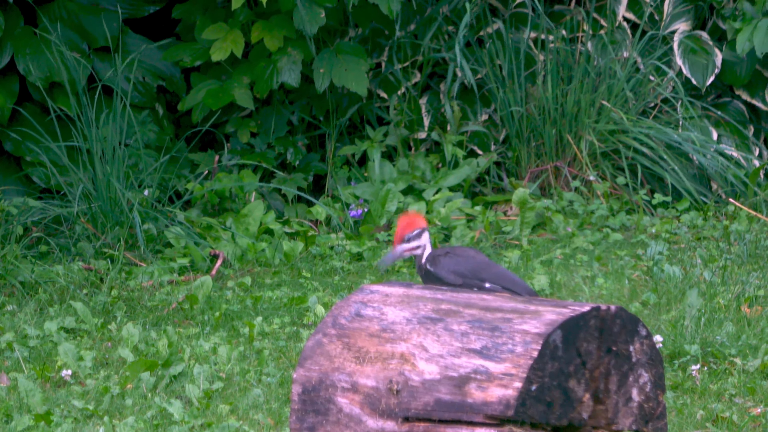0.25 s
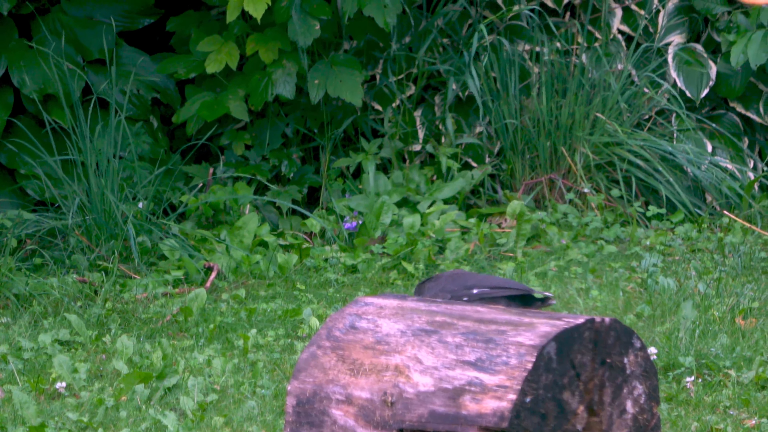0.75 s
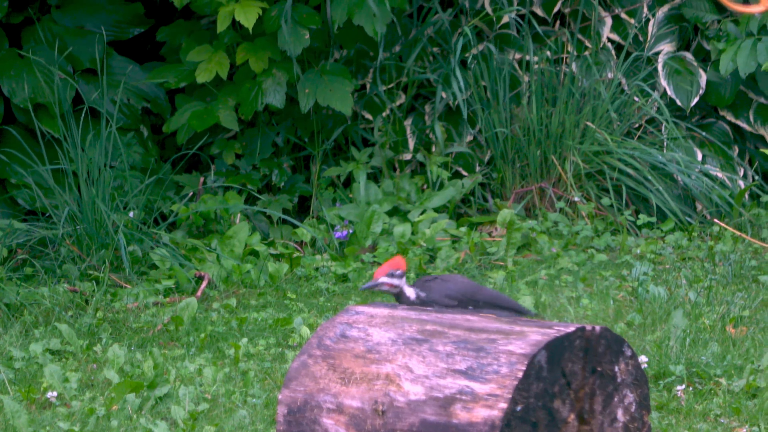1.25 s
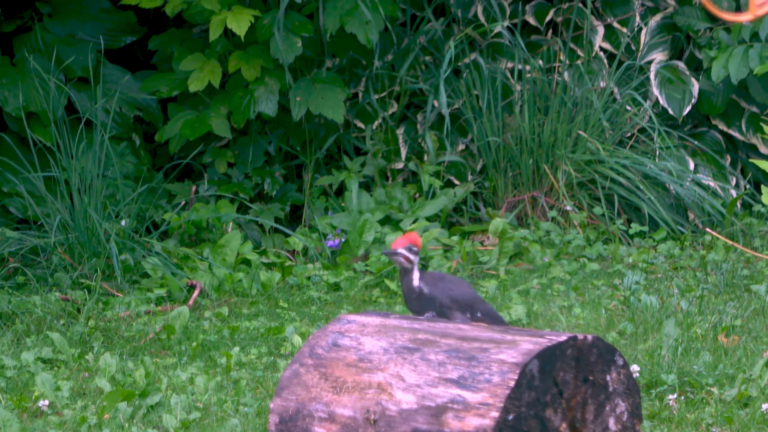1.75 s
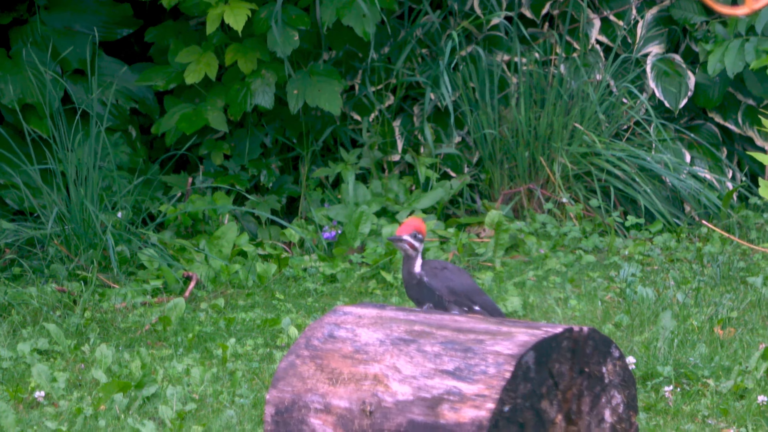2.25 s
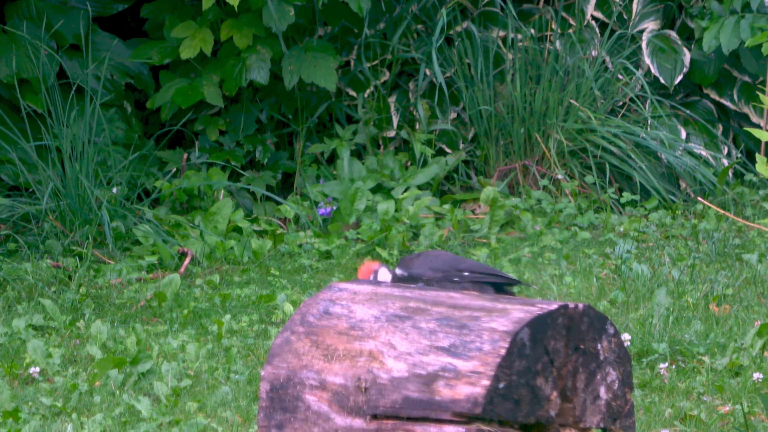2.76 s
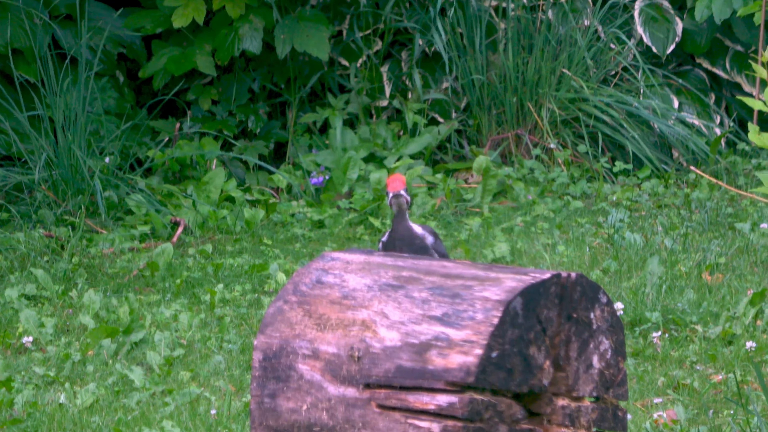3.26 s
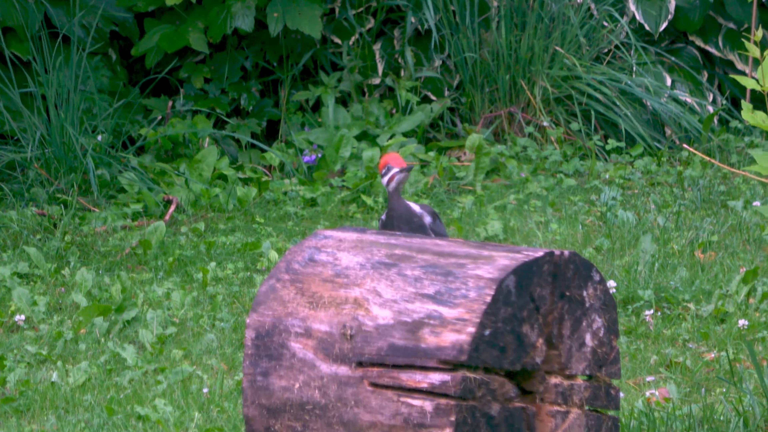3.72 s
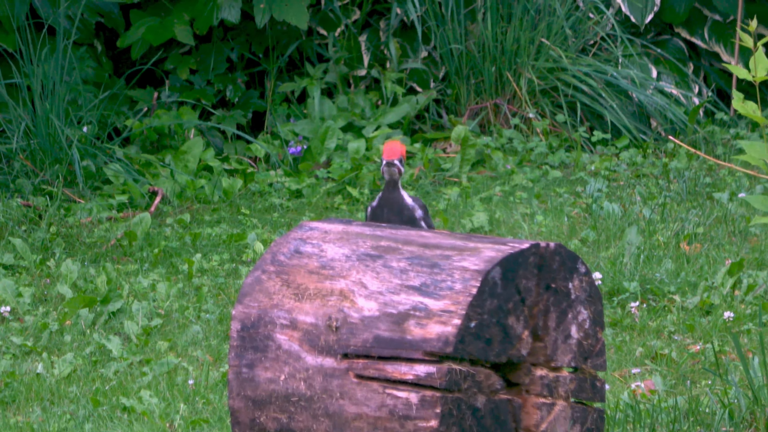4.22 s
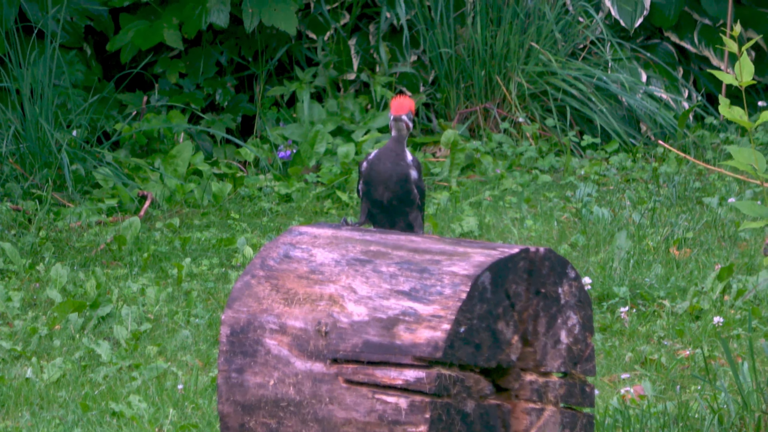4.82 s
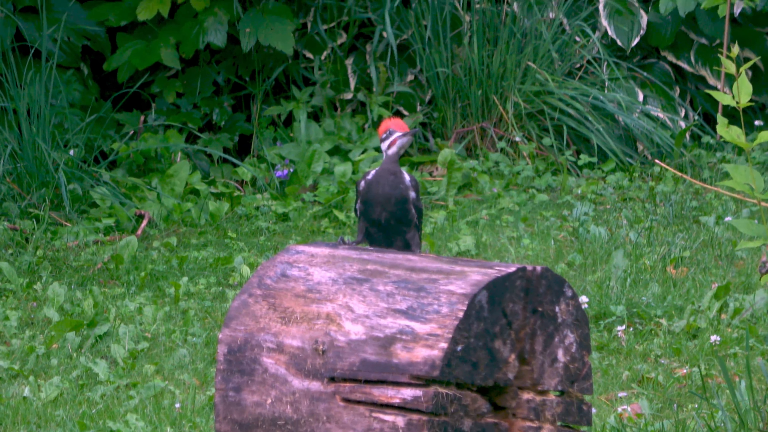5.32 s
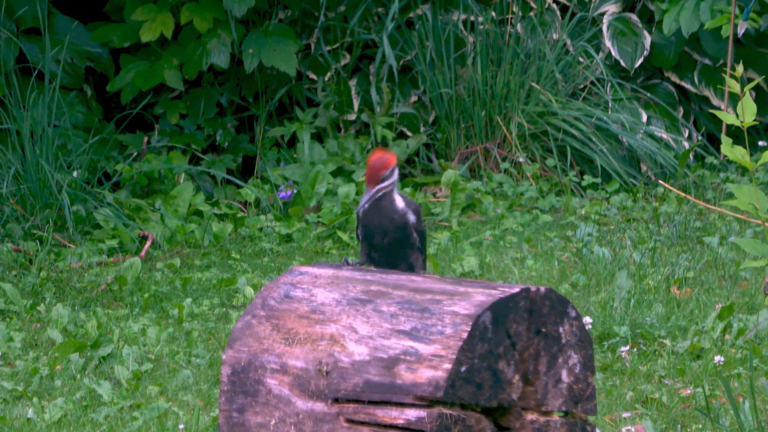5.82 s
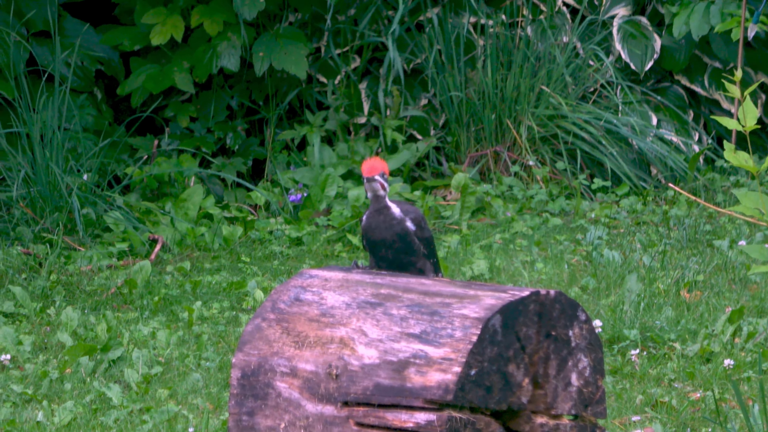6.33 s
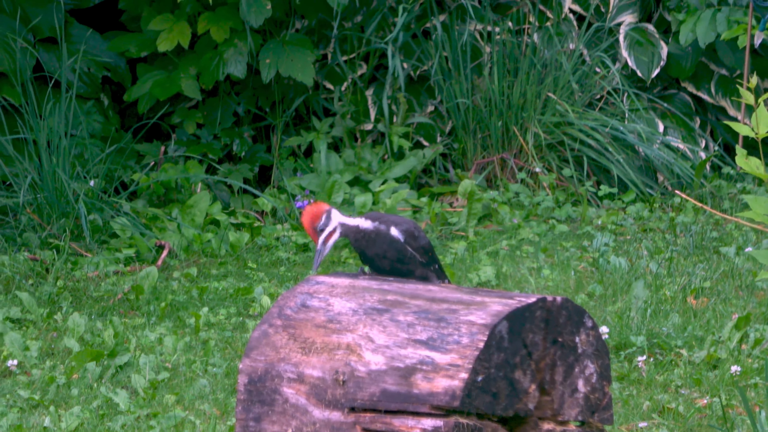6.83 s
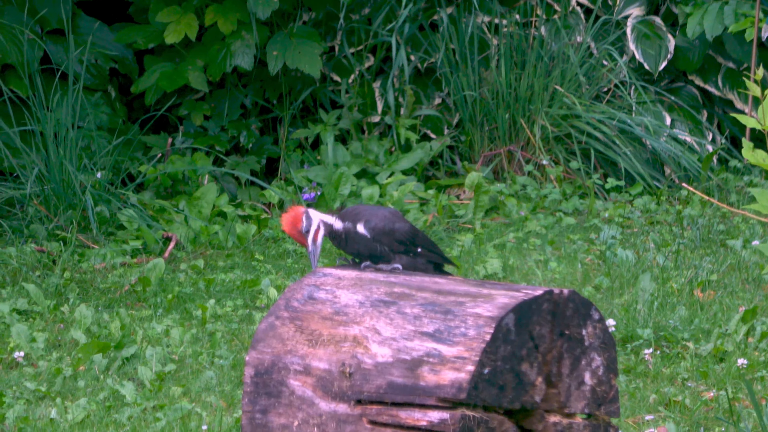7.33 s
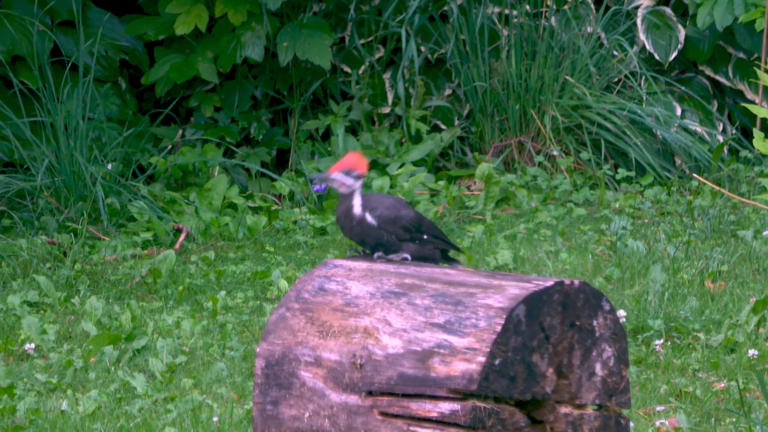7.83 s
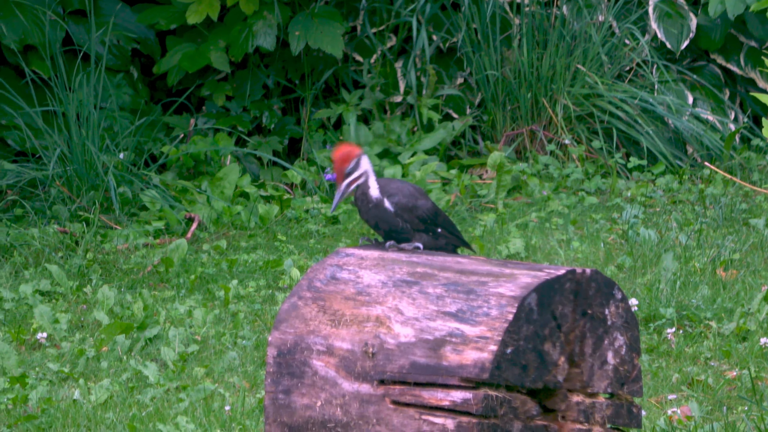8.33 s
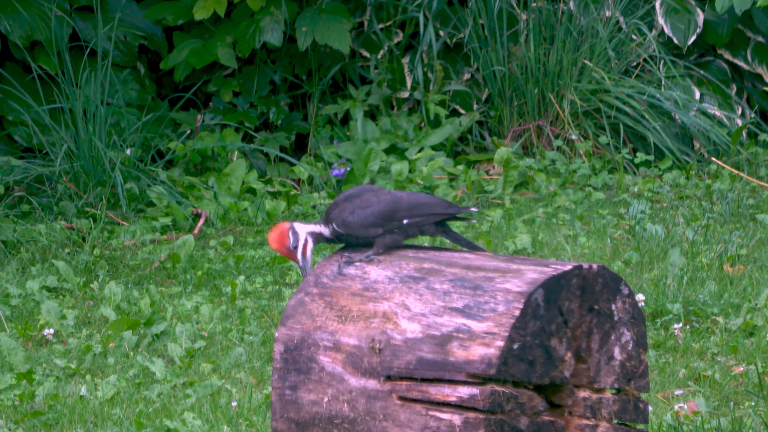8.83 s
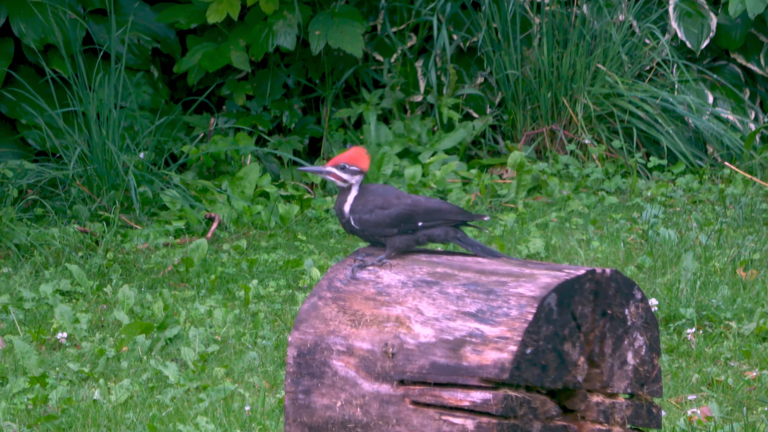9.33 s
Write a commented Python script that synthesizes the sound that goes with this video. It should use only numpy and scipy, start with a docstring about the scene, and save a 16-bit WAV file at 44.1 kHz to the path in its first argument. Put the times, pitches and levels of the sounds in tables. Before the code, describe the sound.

Outdoor stereo garden ambience with soft air hum and a distant helicopter's low chopping. A woodpecker's piercing, raspy yelps dominate at first, about six a second, with short echoes from trees. The calls become sparse, then resume faint and distant on the left. Tiny birds chirp and peep between them; late on, a clear songbird whistles upward twice, then repeats short falling notes.

```python
"""A distant helicopter throbs throughout: periodic blade slaps, bands of noise and wavering tones.
From the start a woodpecker gives a run of harsh 'kuk' calls: pulse trains rocked by a slower oscillation.
Small birds, heard as gliding sines, twitter from the first second on; peeps and faint whistles follow.
The calls slow down and leaves, a burst of noise, rustle once; then the calls go on further off to the left.
Near the end a songbird, a nearly pure tone, gives two rising whistles and a row of downward slurs."""
import sys
import numpy as np
from scipy import signal
from scipy.fft import rfft, irfft, next_fast_len
from scipy.io import wavfile

SR = 44100
rng = np.random.default_rng(int(sys.argv[2]) if len(sys.argv) > 2 else 0)


def unload_wav(signal):
    """Save mono or channel-first audio to the path in sys.argv[1] as 16-bit WAV at rate SR, clipped to [-1, 1]."""
    wavfile.write(
        sys.argv[1],
        SR,
        np.round(np.clip(np.atleast_2d(signal).T, -1, 1) * 32767).astype(np.int16),
    )


N = 422037
TIME = np.arange(N) / SR

# hum of the air, relative spectrum: (frequency [Hz], level [dB])
AIR_COLOUR = [(20, -7), (40, -7), (60, -0.5), (100, 1.5), (135, -1.5), (180, -26), (600, -12.5),
              (2500, -26), (5000, -32), (9000, -38.5), (15500, -56.5)]
# slow change of the air's level: (time [s], level [dB])
AIR_LEVEL = [(0, -55), (7, -54), (9.57, -52)]

# tones of rotor and gears: (frequency [Hz], peak amplitude [dB], time when strongest [s])
ROTOR_TONES = [(56.2, -55, 8.3), (94.5, -59, 11), (133, -56, 4.8), (167, -59.5, 2), (264, -56, 4.0),
               (327, -58, 2.4), (345, -63, 3), (727, -61, 1), (851, -58, 8.7)]
# helicopter bands before their trims: (time [s], rumble level [dB], roar level [dB], rush level [dB])
HELICOPTER_LEVELS = [(0.0, -54.5, -50, -51), (1.06, -53, -50.5, -51), (2.24, -52, -47, -52.5),
                     (3.14, -48.5, -52, -53), (3.52, -52.5, -56, -59.5), (4.16, -45, -54, -53.5),
                     (4.37, -45, -54, -58.5), (5.68, -54.5, -58.5, -62.5), (7.09, -51.5, -56, -58),
                     (7.81, -56, -58.5, -60.5), (8.42, -58.5, -57.5, -64), (9.57, -53, -55.5, -61)]
# relative spectra of the blade slap and the three noise bands: (frequency [Hz], level [dB])
SLAP_COLOUR = [(30, -18), (70, -13), (140, -2), (330, -9.5), (550, -10.5), (900, -31), (2000, -55.5)]
RUMBLE_COLOUR = [(90, -26), (140, 0.5), (190, -6), (280, 0.5), (420, 0), (560, -6.5), (800, -38)]
ROAR_COLOUR = [(430, -16), (600, 1), (830, 7), (980, 3.5), (1250, -25.5)]
RUSH_COLOUR = [(850, -18.5), (1100, 3), (1350, 5), (1700, -1), (2200, -7), (3200, -33.5)]
SLAP_PAIRS_HZ = 19.0
# the slaps take over the rumble: their share of the amplitude grows to one peak and dies away
SLAP_PEAK_S, SLAP_RISE_DB_PER_S, SLAP_FALL_DB_PER_S = 4.5, 2.5, 3.5
SLAP_PEAK_SHARE = .9

# relative spectra of the rustling leaves and of the echo: (frequency [Hz], level [dB])
LEAF_COLOUR = [(1500, -0.5), (4000, -3.5), (7500, -7), (11000, -7.0), (15500, -17)]
ECHO_COLOUR = [(1000, 3.5), (2300, -1.5), (3500, -1), (4600, 2), (6000, -3), (9000, 0.5), (15000, -19.0)]

# two-note peeps: (time [s], level [dB])
PEEPS = [(2.927, -64), (3.714, -57), (4.356, -58), (4.987, -57), (6.214, -60), (7.586, -56.5)]
# a peep slides up, then drops to a lower note that slides down: (start [Hz], end [Hz])
PEEP_UP_HZ, PEEP_DOWN_HZ = (4340, 4980), (4220, 3430)
PEEP_NOTE_S, PEEP_SECOND_NOTE_S = 0.0336, 0.02  # note length, and onset of the second note
# twitters of downward sweeps: (time [s], number of sweeps, sweep interval [s], first level [dB])
TWITTERS = [(1.084, 1, .024, -49), (2.318, 2, .021, -46.5), (2.375, 2, 0.015, -46.5),
            (3.905, 3, 0.018, -48.5), (3.97, 3, 0.02, -48.5), (4.563, 2, 0.037, -54),
            (4.626, 2, .028, -49.5), (6.538, 2, .016, -58), (6.596, 2, 0.023, -54.5),
            (7.244, 1, 0.026, -62), (7.31, 3, 0.016, -54), (8.646, 1, 0.013, -50), (8.678, 2, .022, -48),
            (9.545, 1, .022, -60)]
SWEEP_START_HZ, SWEEP_END_HZ = 5250, 3266  # first sweep of a twitter
SWEEP_PITCH_RATIO, SWEEP_STEP_DB = .9, -3  # each next sweep is lower and softer
SWEEP_FILL = 0.91  # length of a sweep as a share of the interval
# faint whistles of steady mean pitch: (time [s], length [s], pitch [Hz], level [dB])
WHISTLES = [(3.426, 0.11, 2510, -64), (3.684, 0.039, 2530, -60), (3.964, .09, 2500, -61),
            (5.159, .24, 2575, -64), (6.17, .06, 3090, -67)]

# songbird syllables, levels relative to the note: (time from onset [s], pitch [Hz], level [dB])
RISE_SHAPE = [(0, 1620, -16.5), (.08, 1738, -16.5), (.18, 2040, -11), (.28, 2513, -1.5), (.38, 3300, -1),
              (.432, 3790, -2), (.445, 3330, -29)]
SLUR_SHAPE = [(0, 4090, -12), (.004, 2966, -2), (.012, 2258, -4), (.03, 1930, -5), (.056, 1650, -11.5),
              (.066, 1600, -6)]
# songbird notes, the level a syllable's own course is added to: (time [s], level [dB])
RISE_NOTES = [(7.03, -45.5), (7.923, -38.5)]
SLUR_NOTES = [(8.481, -43.5), (8.672, -42), (8.858, -42), (9.038, -41), (9.22, -41), (9.399, -40)]

# woodpecker calls: (time [s], top pitch [Hz], level of the direct sound near 2-4 kHz [dB])
KUKS = [(.035, 1156, -19), (0.171, 1165, -18.5), (0.326, 1159, -18.5), (0.481, 1157, -18.5),
        (0.63, 1162, -18), (.787, 1185, -18), (.951, 1126, -18.5), (1.103, 1165, -19), (1.261, 1172, -18),
        (1.423, 1168, -17.5), (1.587, 1173, -18.5), (1.755, 1161, -20), (1.938, 1127, -22),
        (2.161, 1107, -21.5), (2.4, 1088, -22.5), (2.743, 1087, -24.5), (3.011, 1084, -20.5),
        (3.289, 1036, -23.5), (4.13, 996, -25.5), (4.721, 998, -36.5), (5.387, 1065, -40),
        (5.552, 986, -42), (6.24, 1005, -46), (6.934, 1036, -51), (7.679, 1109, -47), (7.814, 1075, -47),
        (7.994, 1104, -48), (8.166, 1137, -48.5), (8.352, 1107, -47.5), (8.543, 1087, -48.5),
        (8.781, 1090, -49), (8.945, 1079, -48), (9.141, 1075, -49.5), (9.401, 1077, -49.5)]
# course of one call: (share of its length [0-1], pitch / top pitch [ratio], level [dB], roughness [0-1])
KUK_SHAPE = [(0, .68, -30, 1), (.05, .71, -17, 1), (.12, .76, -8, .9), (.23, .85, -4.3, .55),
             (.45, .94, -2, .24), (.64, 1, 0, .11), (.76, .985, 0, .1), (.87, .89, -7, .15),
             (1, .68, -23, .3)]
# throat and open beak, before random variation and pitch scaling: (frequency [Hz], level [dB])
THROAT = [(400, -21.5), (850, -25.5), (1170, -19), (1650, -7.5), (2250, -3.5), (3200, 3), (3950, -2),
          (5100, 1), (5750, -11.5), (6500, -14.5), (8300, -21.5), (10000, -27.5), (12500, -37.5),
          (15500, -42.5)]
# upper bands of the calls: (time [s], brightness near 5 kHz [dB], treble near 7 kHz [dB])
TONE = [(0, 0.5, 3), (.79, 0.5, 3.5), (.95, 0, 6.5), (1.26, 1, 6.5), (1.42, -1.5, 1.5), (1.75, 1.5, 6),
        (1.94, 2, 10.5), (2.16, 0, 7), (2.4, 2.5, 8.5), (2.75, -6.5, 8), (3.01, -1.5, 6.5), (3.29, -6.5, 5),
        (4.13, -3, 6), (4.72, 1, 8), (5.55, 1, 7.5), (7.75, 1.5, 8), (8.55, -1, 5), (9.4, -0.5, 5.5)]
# the caller moves off: (time [s], distance [0 near - 1 far])
DISTANCE = [(0, 0.031), (3.3, .03), (4.15, 0.37), (4.75, .65), (7.7, 0.94)]
# a near call at full effort has this pitch and length; lower calls are shorter, far ones drawn out
FULL_EFFORT_HZ, KUK_S = 1160, 0.079
LENGTH_PER_PITCH, FAR_STRETCH_S = .7, .011  # exponent on the pitch ratio; added length at distance 1
SWELL_DB_PER_HZ = 0.0153  # how softly a near call starts, for each Hz under full effort
NEAR_PAN_DB, FAR_PAN_DB = 0.2, 14.5  # left minus right at distance 0, and what distance 1 adds

TOP_HZ = 15900  # upper limit of the recorder


def undb(db):
    """Gain is the exponential of the level in decibels."""
    return 10 ** (np.asarray(db) / 20)


def unit(x):
    """Normalise by mean power: scale to rms 1."""
    return x / np.sqrt(np.mean(x ** 2))


def curves(table, at):
    """Linear interpolation of every column of a table against its first."""
    first, *columns = np.transpose(table)
    return [np.interp(at, first, column) for column in columns]


def colour(x, points):
    """Minimum-phase filtering: a folded cepstrum makes the given magnitude response causal."""
    size = next_fast_len(x.shape[-1] // 2 + 1024) * 2
    hz, db = np.transpose(points)
    grid = np.maximum(np.fft.rfftfreq(size, 1 / SR), 1)
    gain = undb(np.interp(np.log(grid), np.log(hz), db))
    cepstrum = irfft(np.log(gain))
    cepstrum[1:size // 2] *= 2
    cepstrum[size // 2 + 1:] = 0
    response = np.exp(rfft(cepstrum))
    return irfft(rfft(x, size) * response)[..., :x.shape[-1]]


def wander(rate, size):
    """Band-limited random motion: lines join about rate random values a second, with a spread near 1."""
    steps = np.arange(size) / SR * rate
    knots = rng.standard_normal(size // 8 + 2)
    return 1.2 * np.interp(steps, np.arange(len(knots)), knots)


def pan(x, db):
    """Interaural level difference: place a sound by its left minus right level."""
    gains = undb([[db / 2], [-db / 2]])
    return x * gains / gains.mean()


def add(track, s, x):
    """Superposition: mix a sound into a track at a time in seconds."""
    start = max(int(s * SR), 0)
    track[..., start:start + x.shape[-1]] += x[..., :N - start]


def wide_noise(points, width, pan_db):
    """Partial interaural coherence: a common noise of rms 1 plus a weaker noise opposite in the two ears."""
    mid, side = colour(rng.standard_normal((2, N)), points)
    return pan(unit(mid), pan_db) + width * unit(side) * np.array([[1], [-1]])


def glide(length, start_hz, end_hz, waver):
    """Frequency modulation: a soft-edged sine slides between two pitches by equal ratios, with a waver."""
    size = int(length * SR)
    hz = np.geomspace(start_hz, end_hz, size) * (1 + waver * wander(500, size))
    phase = 2 * np.pi * np.cumsum(hz) / SR
    return np.sqrt(2) * signal.windows.tukey(size, .7) * np.sin(phase)


def air_hum():
    """Broadband noise weighted to low frequencies, with a slowly changing level."""
    level_db, = curves(AIR_LEVEL, TIME)
    return undb(level_db) * wide_noise(AIR_COLOUR, 0.12, 1.7)


def drones(waver=.003, swell_db=0.5, fade_db_per_s=3.5):
    """Tonal radiation of rotor and gears: wavering sines swell and fade at different times as it moves."""
    out = 0
    for hz, db, peak_s in ROTOR_TONES:
        phase = 2 * np.pi * np.cumsum(hz * (1 + waver * wander(4.7, N))) / SR
        level_db = db - fade_db_per_s * np.abs(TIME - peak_s) + swell_db * wander(7.5, N)
        out = out + undb(level_db) * np.sin(phase)
    return pan(out, 0.83)


def blade_slaps(weak_db=-4, weak_lag=.42):
    """Periodic impulsive excitation: strong-weak pairs of clicks, filtered into slaps of rms 1."""
    turn = (TIME - 4.167) * SLAP_PAIRS_HZ

    def clicks(lag):
        """Phase-wrap triggering: one click as each cycle, delayed by lag cycles, begins."""
        count = np.floor(turn - lag)
        return np.diff(count, prepend=count[0])

    pairs = clicks(0) + undb(weak_db) * clicks(weak_lag)
    return unit(colour(pairs * undb(wander(30, N)), SLAP_COLOUR))


def helicopter(flutter_db=1.7, width=0.31, pan_db=-1.5):
    """Impulsive and turbulent rotor noise: slaps share the rumble's power, and the bands swell in the wind."""
    rumble_trim_db, rush_trim_db = -2, -0.13
    since = TIME - SLAP_PEAK_S
    share = SLAP_PEAK_SHARE * undb(np.minimum(SLAP_RISE_DB_PER_S * since, -SLAP_FALL_DB_PER_S * since))
    slaps = pan(blade_slaps(), pan_db)
    rumble, roar, rush = (wide_noise(points, width, pan_db) * undb(flutter_db * wander(12, N))
                          for points in (RUMBLE_COLOUR, ROAR_COLOUR, RUSH_COLOUR))
    throb = share * slaps + np.sqrt(1 - share ** 2) * rumble
    rumble_db, roar_db, rush_db = curves(HELICOPTER_LEVELS, TIME)
    return (throb * undb(rumble_db + rumble_trim_db) + roar * undb(roar_db)
            + rush * undb(rush_db + rush_trim_db))


def rustle(start=3.846, length=0.34, leaf_db=-57, tick_db=-47):
    """Random contact noise: a twig ticks with exponential decay and leaves rustle in uneven bursts."""
    t = np.arange(int(length * SR)) / SR
    bursts = undb(leaf_db + 3.9 * wander(220, len(t))) * signal.windows.tukey(len(t), .3)
    tick = undb(tick_db) * np.exp(-t / 0.0068)
    noise = unit(colour(rng.standard_normal(len(t)), LEAF_COLOUR))
    out = np.zeros((2, N))
    add(out, start, pan((bursts + tick) * noise, 5.7))
    return out


def trees(x, near_db=-17, near_t60=0.1, far_db=-22.5, far_t60=0.39, width=0.37, leaf_loss_db=-6):
    """Diffuse reverberation: convolve with scatter from near leaves and a long dull echo from far trees."""
    t = np.arange(SR) / SR
    near, far = rng.standard_normal((2, 2, SR))
    near = near * undb(-60 * t / near_t60) * (t > .002)
    far = far * undb(-60 * t / far_t60) * (1 - np.exp(-t / 0.029))
    # foliage takes the treble out of the long path
    far = colour(unit(far), [(5200, 0), (6500, leaf_loss_db / 2), (12000, leaf_loss_db)])
    mid, side = (undb(near_db) * unit(near) + undb(far_db) * far) / np.sqrt(SR)
    echo = colour(np.array([mid + width * side, mid - width * side]), ECHO_COLOUR)
    return pan(signal.fftconvolve(x[None], echo, axes=1)[:, :N], 2.9)


def bounce(x, share, scatter):
    """Multipath interference: a ground reflection favours the left, and leaves on the way smear the sound."""
    reflection = share * np.roll(x, int(rng.uniform(.0004, .002) * SR))
    t = np.arange(int(.03 * SR)) / SR
    leaves = rng.standard_normal(len(t)) * np.exp(-t / .007)
    smear = signal.fftconvolve(x, scatter * leaves / np.linalg.norm(leaves))
    clear = np.pad(x + pan(reflection, 7.0), ((0, 0), (0, len(t) - 1)))
    return (clear + smear) / np.sqrt(1 + share ** 2 + scatter ** 2)


def wall_echo(x, delay_s=0.058, echo_db=-13):
    """Specular reflection: one distinct delayed repeat from the edge of the garden."""
    return x + undb(echo_db) * np.pad(x, (int(delay_s * SR), 0))[:N]


def small_birds(peep_waver=0.015, sweep_waver=0.037, whistle_waver=0.0087):
    """Gliding sinusoids: up-and-down peeps, twitters that step downward, and faint level whistles."""
    out = np.zeros(N)
    for s, db in PEEPS:
        add(out, s, undb(db) * glide(PEEP_NOTE_S, *PEEP_UP_HZ, peep_waver))
        add(out, s + PEEP_SECOND_NOTE_S, undb(db) * glide(PEEP_NOTE_S, *PEEP_DOWN_HZ, peep_waver))
    for s, count, interval, db in TWITTERS:
        for k in range(round(count)):
            ratio = SWEEP_PITCH_RATIO ** k
            sweep = glide(interval * SWEEP_FILL, SWEEP_START_HZ * ratio, SWEEP_END_HZ * ratio, sweep_waver)
            add(out, s + k * interval, undb(db + k * SWEEP_STEP_DB) * sweep)
    for s, length, hz, db in WHISTLES:
        add(out, s, undb(db) * glide(length, hz, hz, whistle_waver))
    return out


def songbird(overtone_db=-21):
    """Nearly pure tones under frequency modulation: rising whistles, then slurs; a faint fourth harmonic."""
    out = np.zeros(N)
    for shape, notes in (RISE_SHAPE, RISE_NOTES), (SLUR_SHAPE, SLUR_NOTES):
        for s, db in notes:
            t = np.arange(int(shape[-1][0] * SR)) / SR
            hz, swell_db = curves(shape, t)
            phase = 2 * np.pi * np.cumsum(hz * (1 + 0.003 * wander(122.3, len(t)))) / SR
            # the harmonic passes only near a beak resonance
            overtone = undb(overtone_db) * np.exp(-((hz - 2020) / 260) ** 2)
            add(out, s, undb(db + swell_db) * (np.sin(phase) + overtone * np.sin(4 * phase)))
    return out * np.sqrt(2)


def syrinx(length, top_hz, swell_db):
    """Coupled oscillation: a pulse train is modulated by a slower motion at a fifth of its rate."""
    # depths vary from call to call: phase (rock, sway) in radians, amplitude (throb, beat) as shares
    rock, sway, throb, beat = np.array([.27, .19, .2, .34]) * (1 + .12 * rng.standard_normal(4))
    jitter, shimmer, rasp = .38, .35, .65
    size = int(length * SR)
    share = np.linspace(0, 1, size)
    ratio, db, rough = curves(KUK_SHAPE, share)
    clean = 1 - rough
    db = db + np.interp(share, [0, .6], [-swell_db, 0])
    phase = 2 * np.pi * np.cumsum(top_hz * ratio) / SR
    slow = phase / 5 + rng.uniform(0, 2 * np.pi)
    # the slow motion and its octave push the pulses early and late
    phase = phase + clean * sway * np.sin(slow) + rock * np.sin(2 * slow + 1.06)
    phase = phase + jitter * rough * wander(900, size)
    # they also make the pulses strong and weak
    strength = 1 + clean * beat * np.sin(slow) + throb * np.cos(2 * slow + 2.04)
    strength = strength + shimmer * rough * wander(900, size)
    harmonics = np.arange(1, 19)[:, None]
    pulses = -unit(np.cos(harmonics * phase).sum(axis=0))
    # bright turbulence in time with the pulses, strongest while the voice is rough
    hiss = rasp * (.15 + rough) * (1 + np.cos(phase)) * np.diff(rng.standard_normal(size + 1))
    return (strength * pulses + hiss) * undb(db)


def kuk(length, top_hz, bright_db, treble_db, top_db, swell_db):
    """Source and filter: syrinx pulses pass through dispersive ringing and the resonances of throat and beak."""
    ring_s = .0018
    source = syrinx(length, top_hz, swell_db)
    size = len(source)
    source = np.pad(source, (0, 512))
    # delay is longest near 2.4 kHz, so each beat sweeps down from 5 to 2 kHz
    grid = np.fft.rfftfreq(len(source), 1 / SR)
    lateness = ring_s * np.interp(grid, [800, 2400, 5600], [.3, 1, 0])
    source = irfft(rfft(source) * np.exp(-2j * np.pi * np.cumsum(lateness) * grid[1]))
    # the throat widens for the deeper calls: resonances under 3.6 kHz move with the pitch
    scale = top_hz / 1160
    # the beak never opens quite the same way twice
    throat = [(hz * scale if hz < 3600 else hz, db + 1.1 * rng.standard_normal()) for hz, db in THROAT]
    voice = colour(source, throat)
    band = signal.butter(4, [1800, 3900], "band", fs=SR, output="sos")
    body = signal.sosfilt(band, voice)
    # the top comes and goes as the head turns
    top = [(3300, 0), (4400, bright_db), (5400, bright_db), (6800, treble_db), (13000, top_db)]
    return colour(voice / body[:size].std(), top)


def woodpecker(pivot_db=-22, echo_slope=0.42, near_bounce=0.25, far_bounce=0.62):
    """Direct and reverberant fields: calls as they arrive, and as sent to the trees, where level varies less."""
    beaming, far_loss_db = 1.68, -9
    direct, sent = np.zeros((2, N)), np.zeros(N)
    for s, hz, db in KUKS:
        distance = np.clip(curves(DISTANCE, s)[0], 0, 1)
        bright_db, treble_db = curves(TONE, s)
        length = KUK_S * (hz / FULL_EFFORT_HZ) ** LENGTH_PER_PITCH + FAR_STRETCH_S * distance
        # hard calls start at full strength, easier ones swell up
        swell_db = SWELL_DB_PER_HZ * max(FULL_EFFORT_HZ - hz, 0) * (1 - distance / 2)
        # the highest treble is the most directional, and foliage absorbs it
        top_db = beaming * treble_db + distance * far_loss_db
        call = kuk(length, hz, bright_db, treble_db, top_db, swell_db)
        share = near_bounce + distance * (far_bounce - near_bounce)
        scatter = .12 + 1.1 * distance
        arriving = bounce(call, share, scatter) * undb(db)
        add(direct, s, pan(arriving, NEAR_PAN_DB + FAR_PAN_DB * distance))
        add(sent, s, call * undb(pivot_db + echo_slope * (db - pivot_db)))
    return direct, sent


def scene(song_send_db=13, chirp_send_db=12):
    """Superposition of fields: birds and their tree echoes over leaves, helicopter and the hum of the air."""
    background = air_hum() + drones() + helicopter() + rustle()
    chirps, song = small_birds(), wall_echo(songbird())
    calls, sent = woodpecker()
    echoes = trees(sent + undb(song_send_db) * song + undb(chirp_send_db) * chirps)
    return background + echoes + pan(chirps, 1.8) + pan(song, 3.1) + calls


def record(dry):
    """Saturation and band limiting: the recorder rounds the highest peaks and cuts the top."""
    ceiling = .62
    rounded = dry / (1 + (dry / ceiling) ** 6) ** (1 / 6)
    return signal.sosfilt(signal.ellip(10, .2, 70, TOP_HZ, fs=SR, output="sos"), rounded)


dry = scene()
out = record(dry)
unload_wav(out)
```